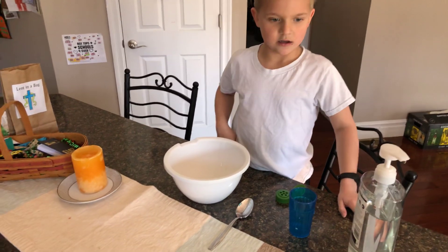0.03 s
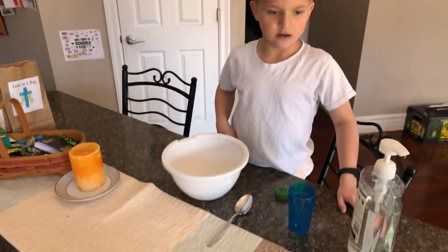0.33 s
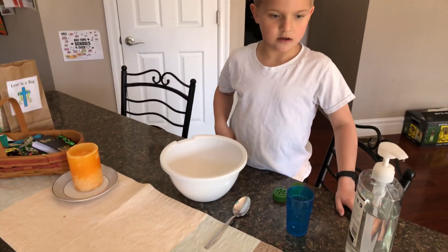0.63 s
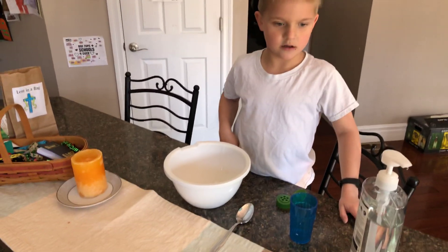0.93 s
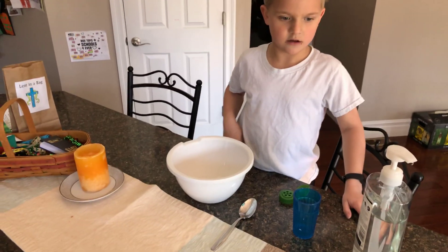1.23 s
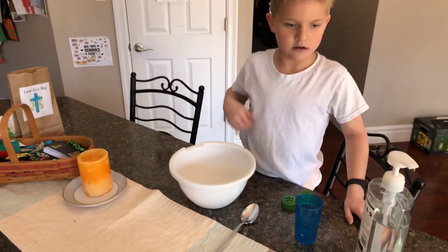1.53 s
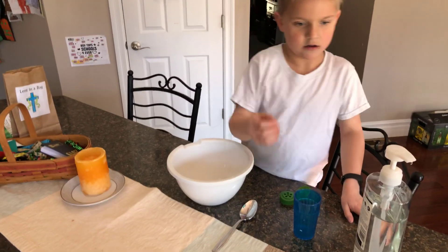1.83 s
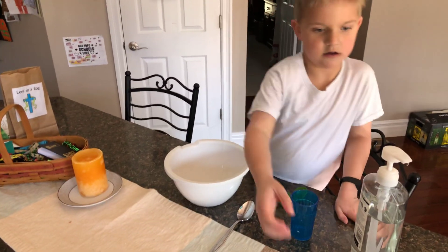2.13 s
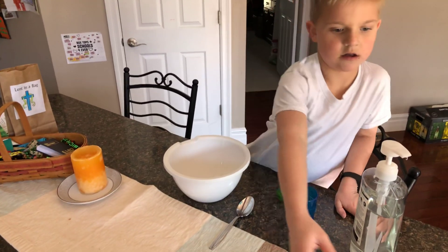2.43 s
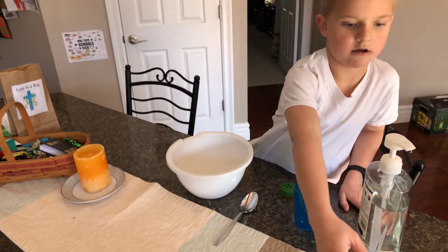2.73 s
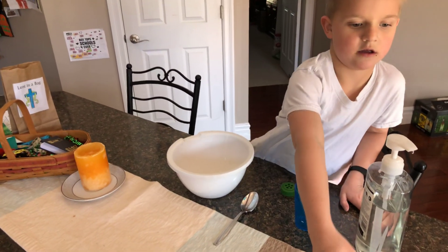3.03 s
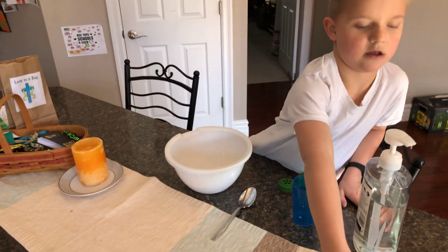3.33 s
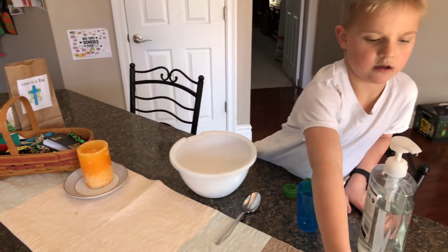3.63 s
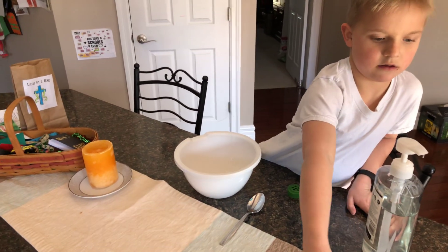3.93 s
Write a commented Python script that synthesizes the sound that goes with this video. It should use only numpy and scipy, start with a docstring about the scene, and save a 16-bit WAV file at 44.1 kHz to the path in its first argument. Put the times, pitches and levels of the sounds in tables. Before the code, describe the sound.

Evenly paced knocks, each a clack with a low thud, sound on a countertop in a quiet, slightly echoing kitchen. Dull bumps and faint sliding follow, then a loud thump, a tiny spoon chatter and a last light tap.

```python
"""A kitchen with a stone counter: something hard is knocked on it in an even beat, then nudged about and
brought down with one heavy thump that sets a spoon chattering. Each knock is a tick and snap of
contact, a clack of the object and a thud from the low modes of the counter and its cabinet.
Light things click and rustle, a finger flicks a plastic cup, and the room rings after every blow."""
import sys
import numpy as np
from scipy import signal
from scipy.fft import rfft, irfft
from scipy.io import wavfile
from scipy.ndimage import uniform_filter1d

SR = 44100
rng = np.random.default_rng(int(sys.argv[2]) if len(sys.argv) > 2 else 0)


def bounce(signal):
    """Save signal as a 16-bit WAV file at the path given by the first command-line argument."""
    frames = np.transpose(np.atleast_2d(signal))
    limited = np.clip(frames, -1, 1)
    pcm = np.round(limited * 32767).astype(np.int16)
    wavfile.write(sys.argv[1], SR, pcm)


N = 176400
LEAD = SR // 2  # lets an earlier knock ring into the opening
SPAN = N + LEAD
TIME = (np.arange(SPAN) - LEAD) / SR


def blows():
    """Impact excitation: every blow gives a thud and a clack; hard contact adds a snap and a tick."""
    # t/s, thud level/dB, clack level/dB, clack top f/Hz, snap level/dB, tick level/dB, tick top f/Hz
    knocks = [(-.14, -22, -32.5, 1220, -55, -34.5, 7000), (0.2559, -25, -42, 1820, -46, -36, 8400),
              (0.7098, -23, -32, 1130, -39.5, -43.5, 10200), (1.1699, -17.5, -29, 1300, -35.5, -41, 5140),
              (1.6260, -19.5, -32.5, 1020, -53, -57, 7900), (2.0010, -27.5, -43.5, 910, -59, -65, 5000),
              (3.2346, -22.5, -36, 1200, -43.5, -53, 6000), (3.2501, -12.5, -16, 2130, -29.5, -40.5, 8730),
              (3.3196, -22, -37.5, 1190, -45.5, -49.5, 9000),
              (3.8533, -32.5, -44, 1480, -61.5, -62.5, 4060)]
    # dull bumps as the object settles or is nudged: t/s, thud level/dB, clack level/dB
    bumps = [(.351, -27.5, -41.5), (.386, -29, -41), (.414, -30, -50), (.742, -30, -41), (.79, -28, -42),
             (2.158, -46, -68.5), (2.446, -36.5, -57.5), (2.791, -31.5, -55.5), (2.818, -35.5, -63),
             (3.086, -34, -57.5), (3.121, -32, -62), (3.811, -45, -65.5)]
    thud_lag_s, clack_lag_s, contact_lead_s = 0.003148, 0.00075, 0.000985
    thuds, clacks, ticks, snaps = np.zeros((4, SPAN))
    thud = counter_thud()
    for s, thud_db, clack_db, clack_hz, snap_db, tick_db, tick_hz in knocks:
        add(thuds, s + thud_lag_s, thud_db, thud)
        add(clacks, s + clack_lag_s, clack_db, clack(clack_hz))
        add(snaps, s - contact_lead_s, snap_db, snap())
        add(ticks, s - contact_lead_s, tick_db, tick(tick_hz))
    for s, thud_db, clack_db in bumps:
        add(thuds, s + thud_lag_s, thud_db, thud)
        add(clacks, s + clack_lag_s, clack_db, clack(top_hz=1240))
    return thuds, clacks, ticks, snaps


def counter_thud():
    """Free vibration: the damped low modes of counter and cabinet, with one reflection off a wall."""
    # modes: f/Hz, relative level/dB, T60/s
    modes = [(73.4, -3, 0.16), (131.5, -17, 0.27), (151.8, -5, 0.28), (222.4, -17, 0.9), (261.6, -19, 0.4),
             (302.3, 13, .1), (300.8, -16, 0.61), (331.5, -13.5, .42), (384.65, -11.5, 0.55),
             (366, 3.5, 0.07), (423, -21, 0.78)]
    echo_s, echo_db = 0.024, -8
    t = np.arange(SR) / SR
    ring = sum(from_db(db - 60 * t / t60) * np.sin(2 * np.pi * hz * t) for hz, db, t60 in modes)
    ring = -cut(cut(ring, 800, "low"), 130, "high", order=3)
    return ring + from_db(echo_db) * np.interp(t - echo_s, t, ring, left=0)


def clack(top_hz):
    """A gritty force impulse: harder contact widens its spectrum, up to the object's own limit."""
    grit, ceiling_hz = 0.23, 2510
    force = grit * burst(decay_s=0.005)
    force[0] += 1
    contact = cut(cut(force, 480, "high"), top_hz, "low", order=4)
    return cut(contact, ceiling_hz, "low", order=6)


def tick(top_hz):
    """Contact noise: the bright crunch of first touch, with a broad dip in its treble."""
    crunch = cut(cut(burst(decay_s=0.0055, rise_s=0.0012), 2870, "high"), top_hz, "low")
    return crunch - 0.53 * resonate(crunch, hz=9300, width_hz=4500)


def snap():
    """Heavily damped resonance: a very short contact pulse rings for only a few cycles."""
    hz, width_hz = 2410, 520
    return resonate(resonate(burst(decay_s=0.00054), hz, width_hz), hz, 2 * width_hz)


def drag():
    """Sliding friction: a random force keeps the counter's modes murmuring, with a faint hiss."""
    # envelope of the object's slide: t/s, level/dB
    envelope = [(2.28, -91), (2.36, -54), (2.47, -63), (2.6, -54.5), (2.76, -69), (2.87, -55.5),
                (3.02, -51.5), (3.16, -47.5), (3.229, -40.5), (3.279, -77)]
    hiss_db = -26.5
    friction = cut(rng.standard_normal(SPAN), 966, "low")
    rub = cut(signal.fftconvolve(friction, counter_thud())[:SPAN], 240, "high")
    hiss = cut(cut(rng.standard_normal(SPAN), 1300, "high"), 3200, "low")
    s, db = np.transpose(envelope)
    gain = from_db(np.interp(TIME, s, db, left=-120, right=-120))
    return (rub / rub.std() + from_db(hiss_db) * hiss / hiss.std()) * gain


def spoon():
    """Rebound: after the thump a spoon bounces on the stone, each touch exciting its bright modes."""
    # bounces: t/s, level/dB
    bounces = [(3.255, -53.5), (3.267, -51), (3.273, -50.5), (3.295, -59), (3.32, -71), (3.34, -63)]
    # modes: f/Hz, relative level/dB, bandwidth/Hz
    modes = [(6670, 6.5, 500), (7500, -1, 670), (11220, 16, 110), (14000, -7, 3000)]
    track = np.zeros(SPAN)
    for s, db in bounces:
        touch = burst(decay_s=0.00093)
        ring = sum(from_db(mode_db) * resonate(touch, hz, width) for hz, mode_db, width in modes)
        add(track, s, db, ring)
    return track


def cup():
    """Modal damping: a finger flicks a plastic cup, whose broad resonances die at once."""
    # modes, alternating in sign: f/Hz, relative level/dB, bandwidth/Hz
    modes = [(1295, 2, 116), (1890, 0.5, 200), (2280, -1, 240), (4200, -10.5, 490), (6300, -16.5, 520),
             (7440, -14.5, 600)]
    touch = cut(burst(decay_s=0.0037), 1080, "high", order=4)
    ring = sum((-1) ** k * from_db(db) * resonate(touch, hz, width)
               for k, (hz, db, width) in enumerate(modes))
    track = np.zeros(SPAN)
    add(track, s=2.6, db=-44.5, sound=ring)
    return track


def small_clicks():
    """Band-limited contact noise: small things click and rustle, too light to move the counter."""
    # t/s, level/dB, lowest f/Hz, highest f/Hz, decay time/s
    clicks = [(1.83, -63.5, 3800, 13800, 0.058), (1.949, -67.5, 4000, 14000, .004),
              (2.322, -63, 4270, 12600, 0.015), (2.917, -66, 1950, 2540, 0.002),
              (3.045, -66, 1750, 2250, 0.016)]
    track = np.zeros(SPAN)
    for s, db, low_hz, high_hz, decay_s in clicks:
        thin = cut(burst(decay_s), low_hz, "high", order=4)
        add(track, s, db, cut(thin, high_hz, "low", order=4))
    return track


def lingering_tones(clacks):
    """Resonance: faint pitched tones linger in the room after each clack."""
    # narrow peaks in the room's response: f/Hz, peak level over the clack/dB
    peaks = [(599, 4), (670, 6), (718, 8.5), (761, 8.5), (824, -10), (888, -1), (1034, 4), (1076, 3.5),
             (1308, -12), (1411, 2.5), (1613, 9.5), (1815, 11), (2359, 7.5)]
    t60_s = 0.4
    width_hz = np.log(1000) / np.pi / t60_s
    return sum(from_db(db) * resonate(clacks, hz, width_hz) for hz, db in peaks)


def room(x):
    """Reverberation: dense reflections build up, more slowly in the bass, and decay band by band."""
    # f/Hz, reverberant level over the input/dB, T60/s
    reverb = [(70.4, 1, 0.56), (154, -2, .5), (301, -8, 0.6), (513, 5, 0.72), (940, 5.5, 0.6),
              (1975, 1.5, 0.52), (4000, 1, 0.47), (7420, -3, .42), (13480, -5, .3)]
    build_s, build_cycles = 0.011, 1.57
    early_db, early_decay_s = 3, 0.019
    t = np.arange(SR) / SR
    hz = np.fft.rfftfreq(SR, 1 / SR)
    white, tail = rfft(rng.standard_normal(SR)), 0
    early = from_db(early_db) * np.exp(-t / early_decay_s)
    edges = np.geomspace(45, 18000, 37)
    for low, high in zip(edges, edges[1:]):
        centre = np.sqrt(low * high)
        late = from_db(-60 * t / at_hz(reverb, centre, column=2))
        build = 1 - np.exp(-(t / (build_s + build_cycles / centre)) ** 2)
        band = irfft(white * ((hz >= low) & (hz < high)), SR) * (early + late) * build
        unit_gain = np.sqrt(2 * (high - low) / SR / np.sum(band ** 2))
        tail = tail + band * unit_gain * from_db(at_hz(reverb, centre))
    return signal.fftconvolve(x, even_out(tail)[:-SR // 10])[:SPAN]


def even_out(tail):
    """Spectral smoothing: curbs the tail's chance peaks and dips, so it sounds even and less hollow."""
    evenness = 0.36
    spectrum = rfft(tail)
    power = np.abs(spectrum) ** 2
    fine, broad = (np.maximum(uniform_filter1d(uniform_filter1d(power, bins), bins), 1e-12)
                   for bins in (30, 160))
    return irfft(spectrum * np.clip(broad / fine, .1, 10) ** (evenness / 2), len(tail))


def hush():
    """Stationary noise: the faint, steady air of the room."""
    # f/Hz, spectrum level/dB in a 1 Hz band
    density = [(25, -114), (45, -105.5), (70, -86.5), (140, -97.5), (300, -89), (600, -102), (1200, -103),
               (2500, -110), (5000, -113), (7500, -115), (9500, -121), (16000, -125)]
    hz = np.maximum(np.fft.rfftfreq(N, 1 / SR), 1)
    return irfft(rfft(rng.standard_normal(N)) * from_db(at_hz(density, hz)), N) * np.sqrt(SR / 2)


def burst(decay_s, rise_s=1e-5):
    """A noise transient of nearly flat spectrum that swells and decays exponentially."""
    t = np.arange(SR // 5) / SR
    shape = np.exp(-t / decay_s) * (1 - np.exp(-(t + 1 / SR) / rise_s))
    phase = np.angle(rfft(rng.standard_normal(len(t)) * shape))
    puff = irfft(np.exp(1j * phase), len(t)) * np.sqrt(shape)
    return puff * np.sqrt(np.sum(shape ** 2) / np.sum(puff ** 2))


def add(track, s, db, sound):
    """Superposition: lay a sound on the track at time s; 0 dB is the energy of 10 ms at full level."""
    start = max(int(s * SR) + LEAD, 0)
    part = sound[:SPAN - start] * np.sqrt(SR / 100 / np.sum(sound ** 2))
    track[start:start + len(part)] += from_db(db) * part


def resonate(x, hz, width_hz):
    """A damped second-order resonator with unit gain at its peak."""
    r = np.exp(-np.pi * width_hz / SR)
    feedback = [1, -2 * r * np.cos(2 * np.pi * hz / SR), r * r]
    return signal.lfilter(np.array([1, 0, -1]) * (1 - r * r) / 2, feedback, x + 1e-18)


def cut(x, hz, kind, order=2):
    """A maximally flat low-pass or high-pass filter."""
    return signal.sosfilt(signal.butter(order, hz, kind, fs=SR, output="sos"), x + 1e-18)


def at_hz(points, hz, column=1):
    """Interpolation of a table on a log-frequency axis."""
    points = np.array(points)
    return np.interp(np.log(hz), np.log(points[:, 0]), points[:, column])


def from_db(db):
    """Amplitude ratio of a level."""
    return 10 ** (np.asarray(db) / 20)


def scene():
    """Direct and reverberant fields add; thuds and snaps arrive more directly and stay drier."""
    thud_room_db, snap_room_db = -2.5, -6.5
    air = hush()
    thuds, clacks, ticks, snaps = blows()
    contacts = clacks + ticks + drag() + small_clicks() + cup() + spoon()
    reflected = room(contacts + from_db(thud_room_db) * thuds + from_db(snap_room_db) * snaps)
    direct = contacts + thuds + snaps
    return ((direct + lingering_tones(clacks) + reflected)[LEAD:] + air)[None]


def record(dry):
    """Band limiting: a steep low-pass removes the highest treble."""
    cutoff_hz = 16000
    return signal.sosfilt(signal.ellip(10, .1, 80, cutoff_hz, fs=SR, output="sos"), dry)


dry = scene()
out = record(dry)
bounce(out)
```